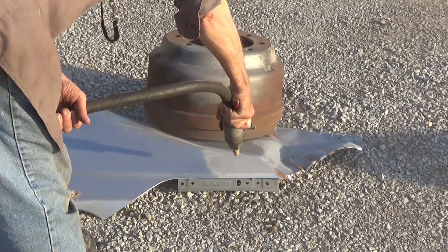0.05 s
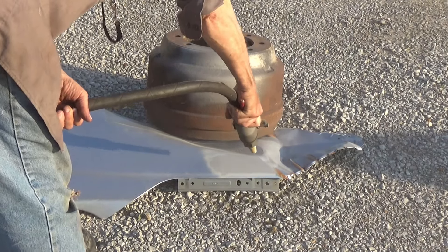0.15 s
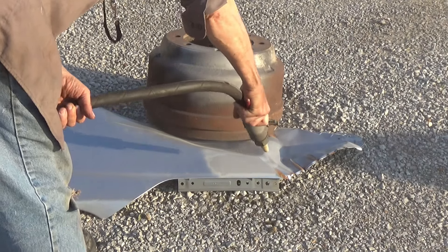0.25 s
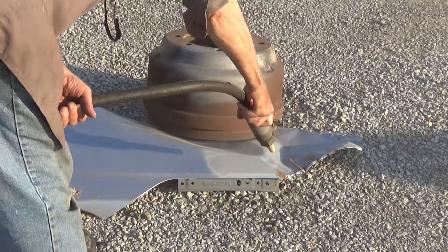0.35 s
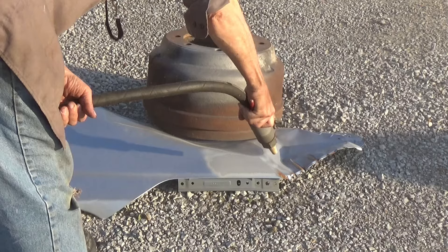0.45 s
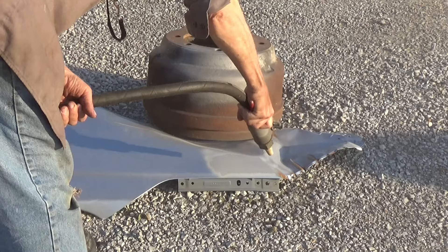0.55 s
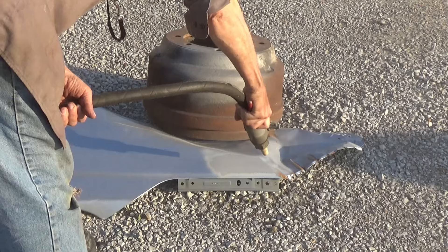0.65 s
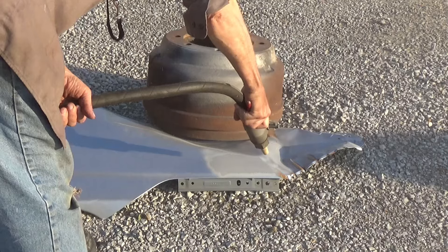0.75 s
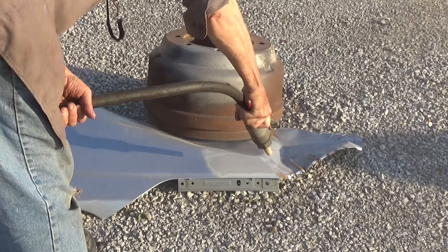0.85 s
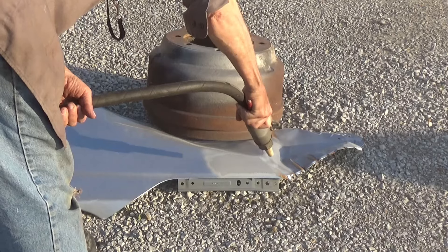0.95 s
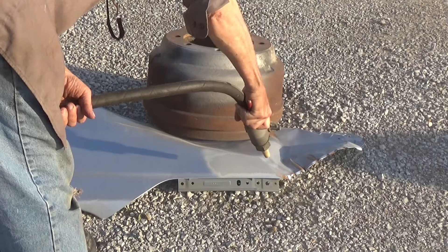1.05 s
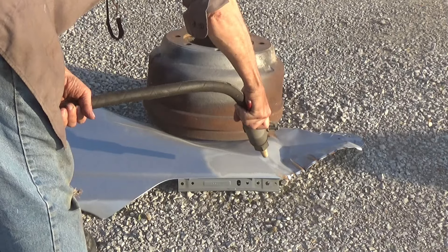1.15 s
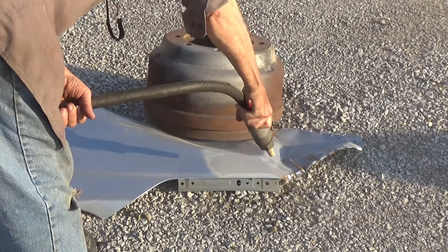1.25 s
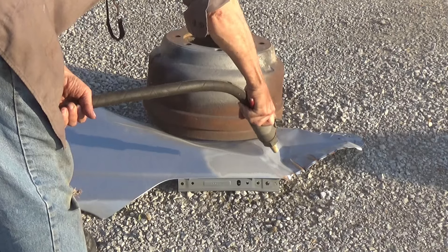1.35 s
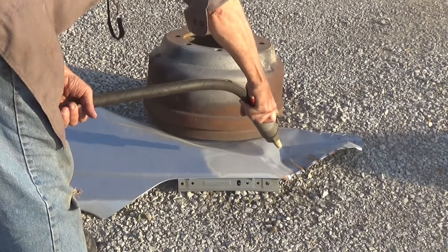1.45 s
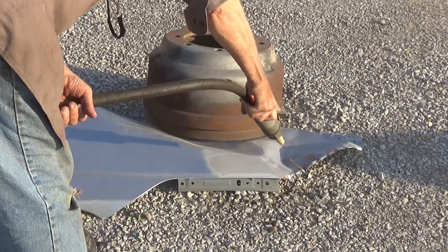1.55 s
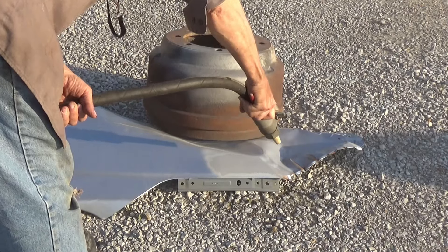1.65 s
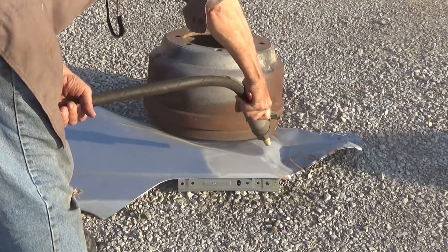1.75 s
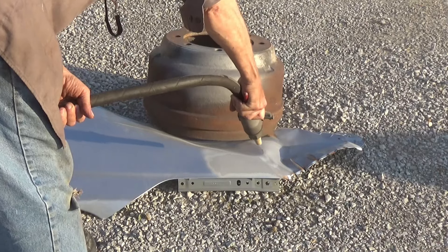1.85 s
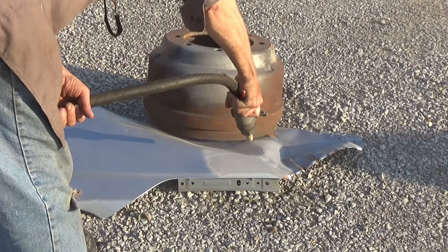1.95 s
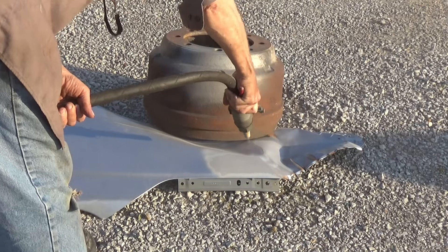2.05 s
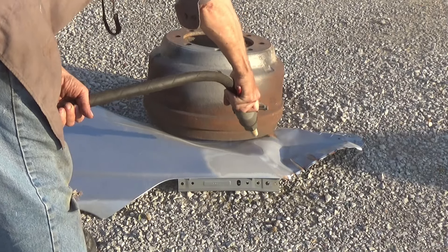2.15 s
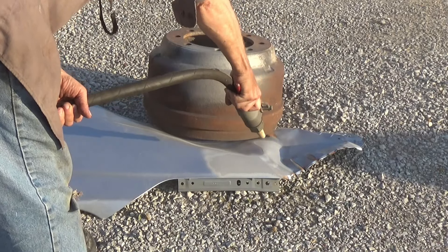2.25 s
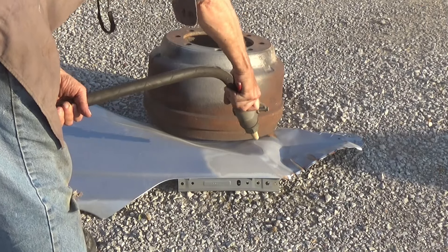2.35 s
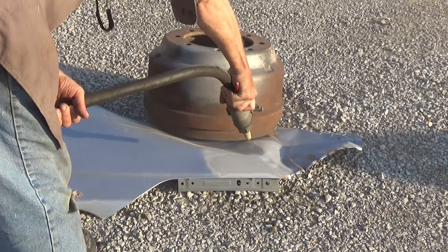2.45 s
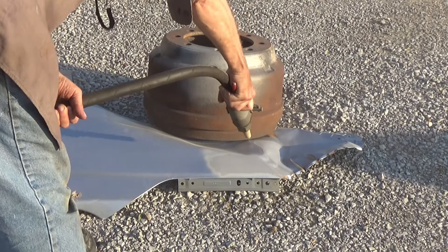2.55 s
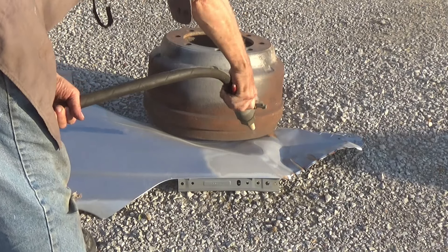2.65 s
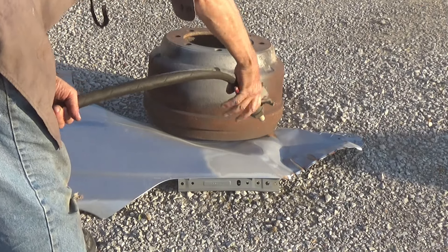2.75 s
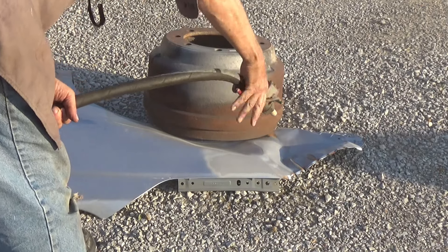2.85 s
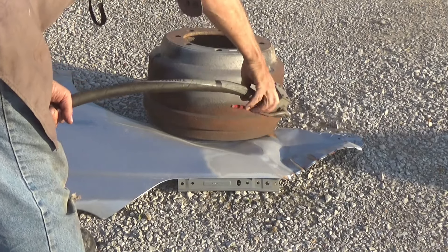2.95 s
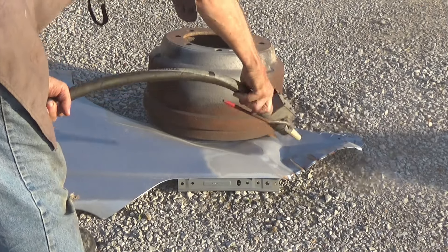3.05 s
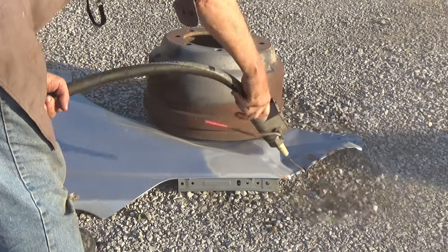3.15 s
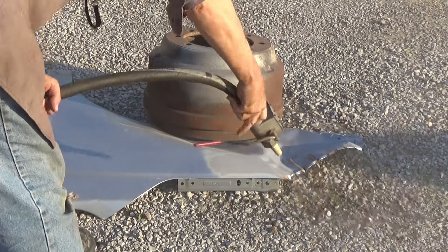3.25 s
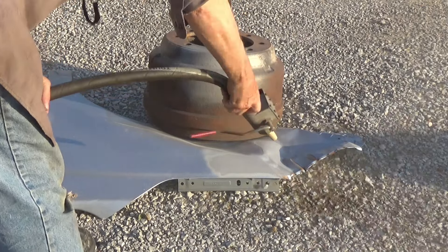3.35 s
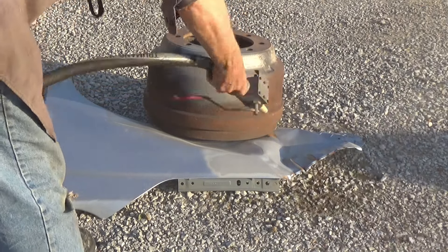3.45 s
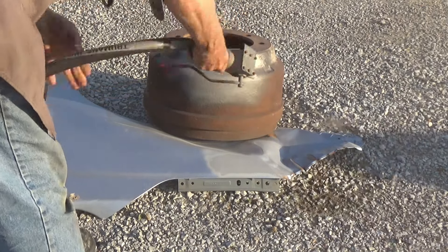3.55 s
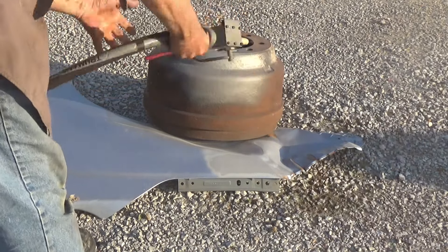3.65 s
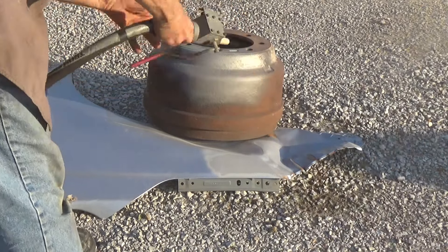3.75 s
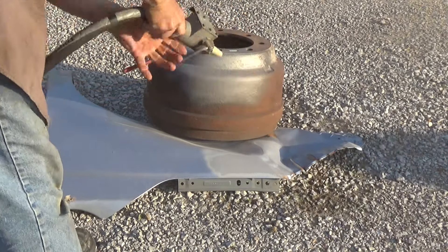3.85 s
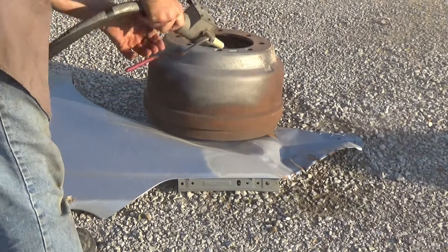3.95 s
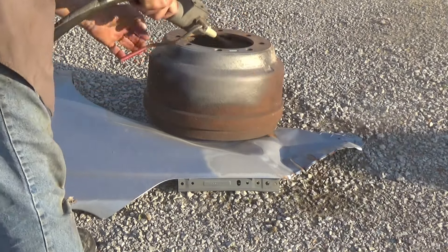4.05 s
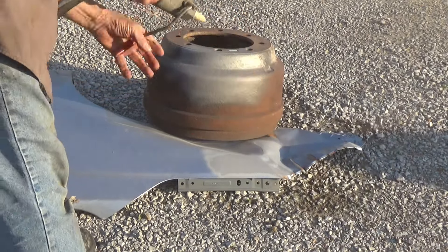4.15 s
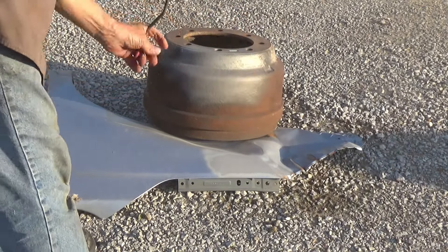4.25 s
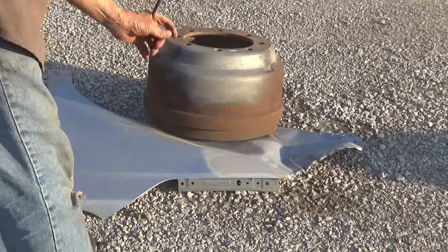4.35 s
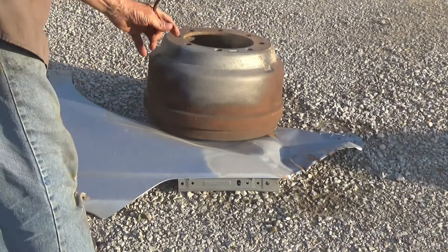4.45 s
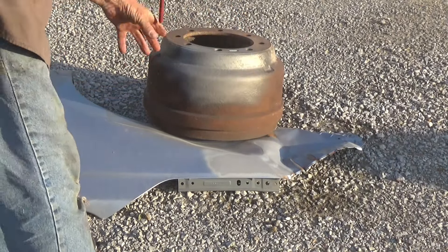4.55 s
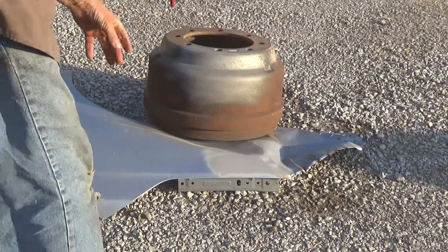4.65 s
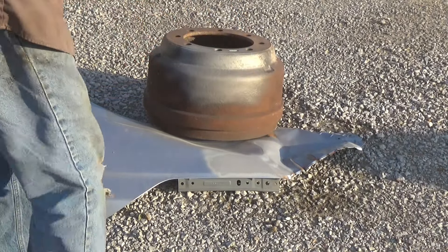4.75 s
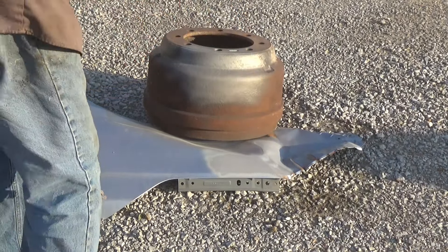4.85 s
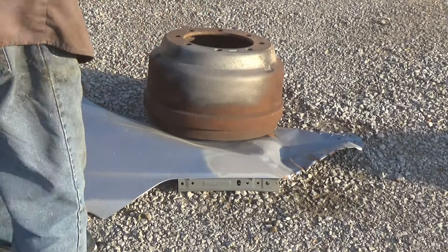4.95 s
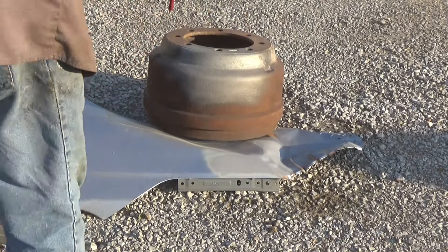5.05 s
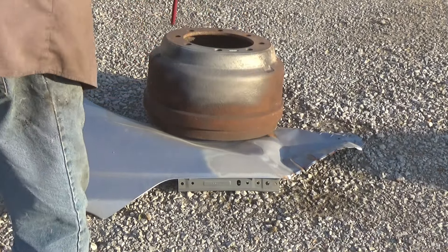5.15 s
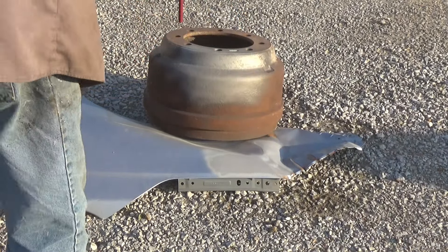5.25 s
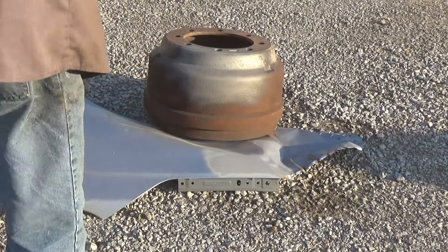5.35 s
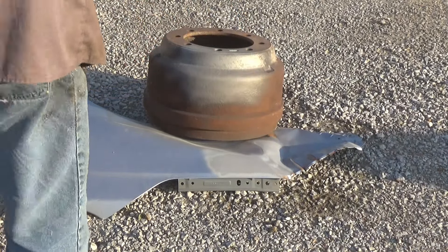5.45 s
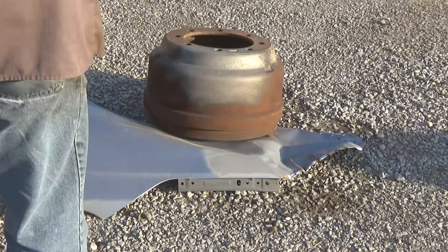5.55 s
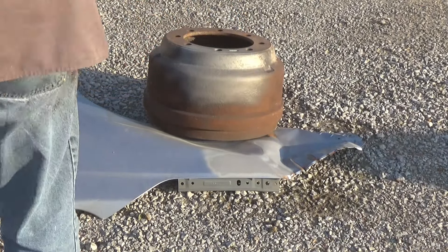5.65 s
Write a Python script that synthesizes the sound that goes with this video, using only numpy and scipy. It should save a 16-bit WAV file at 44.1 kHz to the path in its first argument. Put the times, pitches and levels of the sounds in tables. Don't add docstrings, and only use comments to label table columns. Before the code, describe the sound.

Close by in an open gravel yard, a sandblasting nozzle hisses loudly and grittily against a steel drum, its tone sweeping as the hand moves. Low puffs swell through it. The jet shuts off suddenly, with a short tail from nearby walls and a faint later answer from a far building. A quiet compressor chugs to the left with leaking air; faint birds and one stone click follow. The microphone's automatic gain opens up.

```python
import sys
import numpy as np
from scipy import signal
from scipy.fft import rfft, irfft, next_fast_len
from scipy.io import wavfile
from scipy.ndimage import uniform_filter1d, map_coordinates

SR = 44100
rng = np.random.default_rng(int(sys.argv[2]) if len(sys.argv) > 2 else 0)


def amplitude_ratio(level_db):
    exponent = np.asarray(level_db, float) / 20
    return 10 ** exponent


def unload_audio(sound):
    columns = np.transpose(np.atleast_2d(sound))
    steps = np.round(np.clip(columns, -1, 1) * 32767)
    wavfile.write(sys.argv[1], SR, steps.astype(np.int16))


N = 251811
TIME = np.arange(N) / SR
SHUT_S = 4.397
TURN_HZ = 19.987

# t/s, level/dB, facing the listener/0-1, contact with steel/0-1, beam pitch f/Hz
JET_POSES = [(0, -16.5, 1, 0.92, 10000), (.24, -16, 0.76, 0.98, 10500), (.38, -15.5, 0, 0.58, 10700),
             (.7, -15.5, 0.36, 0.77, 11050), (.9, -16, 0.22, .7, 10940), (1.15, -15.5, 0.51, 0.88, 10900),
             (1.44, -16, 0.15, 0.93, 10700), (1.5, -14.5, 0.2, 0.55, 10000),
             (1.72, -15.5, 0.3, 0.58, 10400), (1.92, -14, 0, 0.21, 9940), (2.4, -14, 0.08, 0.09, 9760),
             (2.75, -13.5, 0.23, 0, 9560), (3.05, -16.5, 0.48, 0.56, 10200),
             (3.3, -16.5, 0.51, 0.42, 10640), (3.75, -15.5, 0.41, 0.25, 10240),
             (3.92, -15.5, 0.55, 0.24, 10000), (4.3, -15.5, 0.8, 0.32, 10000), (4.39, -13, 0.42, 0.2, 9700)]
# low f/Hz, high f/Hz
JET_BANDS_HZ = [(250, 800), (900, 2400), (2800, 7200), (7500, 15500)]
BAND_BASE_DB = [-39, -32.5, -15.5, 0.5]
# change at full facing/dB, change at full contact/dB
BAND_SWING_DB = [(-8.5, 11.5), (1.5, 12), (8.5, 1), (-0.5, -0.5)]
# f/Hz, density/dB per Hz
JET_COLOUR = [(100, -78), (170, -42.5), (509, -22), (664, -19.5), (987, -9), (1310, -6), (1580, -4.5),
              (2060, -5.5), (2490, -10.5), (2900, -8.5), (4930, -6.5), (6930, -14.5), (9550, -9.5),
              (12900, -21), (15600, -34)]
# f/Hz, level/dB
JET_APART = [(300, -33), (1000, -27), (3000, -137), (6000, -59), (8000, -23), (9300, -27), (11000, -27.5),
             (13000, -28)]
# t/s, delay/ms, strength/ratio
SHEET = [
    (0, .57, .3),
    (.33, .58, .05),
    (1.98, .615, .4),
    (2.68, .585, .15),
    (3.0, .6, 0),
    (3.7, .895, 0),
    (3.84, .895, -.33),
]
# t/s, delay/ms, strength/ratio
DRUM = [
    (0, .57, .25),
    (.15, .69, -.4),
    (.28, .6, -.4),
    (.45, .59, -.2),
    (.68, .579, -.45),
    (1.81, .68, -.3),
    (1.97, .595, .05),
    (2.68, .585, .2),
    (3.0, .58, 0),
]
# middle t/s, length/s, level/dB
GUSTS = [
    (2.16, .17, -44),
    (2.72, .5, -50),
    (3.1, .05, -44),
    (3.49, .1, -46),
    (1.42, .08, -51),
    (1.75, .2, -52),
    (3.71, .04, -51),
]
# f/Hz, density/dB per Hz
GUST_COLOUR = [(120, -32), (260, -12), (480, 0), (1100, -2), (1500, -12), (2500, -40)]
# f/Hz, t60/s
YARD_T60 = [(300, 0.11), (2000, 0.13), (6000, 0.52), (10000, 0.14), (15000, 0.15)]
# f/Hz, level/dB
YARD_COLOUR = [(100, -23), (2500, 10.5), (4800, -6), (7500, -2), (11000, 7.5), (16000, 0)]
# f/Hz, level/dB
WALL_COLOUR = [(1000, -10), (3000, 1), (6500, 2.5), (10000, -11), (14000, -14)]
# f/Hz, level/dB
DIFFUSE_APART = [(150, -42), (600, -4), (1400, -77), (3000, -6.5), (6000, -7), (9500, -11.5), (12000, -26),
                 (15000, -30)]
# crank order, level/dB
INTAKE_ORDERS = [(26, -47), (30, -51.5), (25, -54), (27, -55), (28, -55), (24, -59), (18, -61), (20, -62),
                 (21, -61), (23, -63), (34, -63), (35, -65), (47, -64), (54, -57.5), (8, -74), (9, -74)]
# t/ms, level/dB
STROKE = [(0, -1), (5, -1.5), (11, -.5), (16, -5), (24, -2), (29, 2), (38, 4), (45, 4), (49, 0)]
# start t/ms, length/ms, f/Hz, level/dB, left-right/dB
VALVES = [(8, 11, 1490, -53, 9), (23.5, 6, 1500, -54, 10), (29, 9, 1720, -54, 12), (30, 12, 1480, -52, 12),
          (40, 8, 1600, -58, 10), (26, 8, 1040, -58, 10), (33, 15, 1080, -57, 7), (1, 6, 1200, -54, 10),
          (0, 8, 1560, -55, 10), (39, 11, 1840, -57, 11), (8, 7, 2850, -61, 5), (42, 7, 2850, -61, 5),
          (30, 22, 270, -59, 1), (32, 14, 420, -54, 2), (26, 14, 700, -58, 4)]
# f/Hz, density/dB per Hz
CASING = [(150, -30), (260, -19), (480, -11), (620, -17), (800, -16), (1070, -15), (1280, -12), (1450, -12),
          (1880, -12), (1990, -26), (3000, -40)]
# f/Hz, density/dB per Hz
LEAK = [(300, -40), (520, -22), (850, -25), (1530, -21), (2100, -15), (4000, -24), (5100, -22), (7300, -22),
        (10400, -8.5), (12000, -29), (14500, -23), (15700, -38)]
# f/Hz, width/Hz, level/dB
PIPES = [(2800, 190, -8), (3580, 90, -8), (5110, 130, -8), (6080, 130, -12), (7950, 140, -8),
         (9390, 140, -7), (10200, 150, -3), (10550, 120, -3), (11200, 90, -11), (12700, 230, -14)]
# f/Hz, left-right/dB
FAR_PAN = [(200, -5), (700, 14), (1290, 2.5), (2380, 5.5), (4400, 8.5), (8120, -0.5), (15000, 0)]
# start t/s, length/s, start f/Hz, end f/Hz, level/dB
BIRDS = [
    (4.69, .175, 4780, 4740, -59.5),
    (4.69, .075, 2760, 2860, -63),
    (5.24, .068, 2800, 2560, -57),
    (5.374, .05, 2830, 2430, -54),
    (5.325, .04, 3570, 3580, -62),
]
# t/s, peak level/dB
TICKS = [
    (5.0815, -27),
]
# t/s, level/dB
GAIN = [
    (0, -14.5),
    (2, -11.5),
    (3.5, -11),
    (4.38, -10.5),
    (4.45, -2.5),
    (5.0, -1),
    (5.71, 0.6),
]
# f/Hz, density/dB per Hz
FLOOR = [(20, -24), (40, -20), (90, -13), (150, -2), (250, 15), (400, -41)]


def jet(patchy_db=1.5, fine_db=0.5, grit=0.23):
    load = amplitude_ratio(0.14 * wobble(8.3) + 0.53 * wobble(40))
    air = rng.standard_normal((2, N)) * (1 + grit * rng.standard_normal(N)) * load
    hz, t, z = signal.stft(air, SR, nperseg=512)
    rows_hz = hz[:, None]

    def blur(rows, cols):
        smooth = uniform_filter1d(rng.standard_normal(z.shape[1:]), rows, 0)
        return unit(uniform_filter1d(smooth, cols, 1))

    rest_colour = amplitude_ratio(along(JET_COLOUR, hz))
    pose_s, *poses = np.transpose(JET_POSES)
    level_db, facing, contact, beam_hz = (np.interp(t, pose_s, column) for column in poses)

    band_gain_db = []
    for base_db, (face_db, touch_db), (low_hz, high_hz) in zip(BAND_BASE_DB, BAND_SWING_DB, JET_BANDS_HZ):
        inside = (hz > low_hz) & (hz < high_hz)
        rest_db = 10 * np.log10(np.sum(rest_colour[inside] ** 2) / len(hz))
        band_gain_db.append(level_db + base_db + face_db * facing + touch_db * contact - rest_db)
    bands = np.arange(len(band_gain_db))
    centre_hz = np.sqrt(np.prod(JET_BANDS_HZ, axis=1))
    place = np.interp(np.log(hz + 1), np.log(centre_hz), bands)
    share = np.clip(1 - abs(place[:, None] - bands), 0, 1)

    rest_hz, from_hz = 10000, 2800
    slide_hz = np.clip(1 - abs(rows_hz - rest_hz) / (rest_hz - from_hz), 0, 1) * (rest_hz - beam_hz)
    colour = amplitude_ratio(along(JET_COLOUR, rows_hz + slide_hz))
    patches_db = patchy_db * blur(rows=5, cols=30) + fine_db * blur(rows=3, cols=8)

    treble = 1 / (1 + (7500 / (rows_hz + 1)) ** 10)
    drum_share = treble / (1 + (rows_hz / 12500) ** 8)
    echo = bounce(SHEET, rows_hz, t, 1 - treble) * bounce(DRUM, rows_hz, t, drum_share)
    z = z * colour * echo * amplitude_ratio(share @ band_gain_db + patches_db + 0.22)
    hiss = signal.istft(z, SR, nperseg=512)[1][:, :N]
    hiss = filtered(hiss, lambda f: 1 / (1 + (150 / (f + 1)) ** 6))
    closing = 1 + np.exp(np.clip((TIME - SHUT_S) / 0.0064, -50, 50))
    return spread(*hiss, JET_APART) / closing


def bounce(poses, hz, t, share):
    swing_s, tremble, tremble_ms = .11, .22, .006
    pose_s, *pose = np.transpose(poses)
    held = np.array(pose)[:, np.searchsorted(pose_s, t, "right") - 1]
    delay_ms, strength = uniform_filter1d(held, round(swing_s / t[1]), axis=1, mode="nearest")
    shake = lambda: np.interp(t, TIME, wobble(5))
    g = share * strength * (1 + tremble * shake())
    delay_s = (delay_ms + tremble_ms * shake()) / 1000
    return (1 + g * np.exp(-2j * np.pi * hz * delay_s)) / np.sqrt(1 + g * g)


def gusts():
    swell = sum(amplitude_ratio(db) * np.exp(-(2 * (TIME - s) / length_s) ** 2) for s, length_s, db in GUSTS)
    puff = unit(filtered(rng.standard_normal(N), lambda hz: amplitude_ratio(along(GUST_COLOUR, hz))))
    return swell * amplitude_ratio(1.6 * wobble(30)) * puff


def yard(x, stretch):
    hz, t, z = signal.stft(rng.standard_normal((2, SR)), SR, nperseg=256)
    t60_s = stretch * along(YARD_T60, hz)[:, None]
    decay_db = along(YARD_COLOUR, hz)[:, None] - 60 * t / t60_s
    tail = signal.istft(z * amplitude_ratio(decay_db), SR, nperseg=256)[1]
    tail = tail / np.linalg.norm(tail[0])
    return spread(*signal.fftconvolve(x[None], tail, axes=1)[:, :N], DIFFUSE_APART)


def far_wall(x):
    delay_s, level_db = .255, -35
    late = np.pad(x, (round(delay_s * SR), 0))[:N]
    return amplitude_ratio(level_db) * filtered(yard(late, stretch=0.37), lambda hz: amplitude_ratio(along(WALL_COLOUR, hz)))


def compressor(scatter_db=-4.0):
    repeat_db, loose_db = -55.5, -60.5
    turn_s = ((TIME - 4.6) * TURN_HZ) % 1 / TURN_HZ
    ms, db = np.transpose(STROKE)
    stroke = amplitude_ratio(np.interp(turn_s * 1000, ms, db, period=1000 / TURN_HZ) + .4 * wobble(8))
    angle = 2 * np.pi * TURN_HZ * (turn_s - .0082)
    beat = sum(amplitude_ratio(db) * np.cos(order * angle) for order, db in INTAKE_ORDERS)
    out = amplitude_ratio(-1.9) * stroke * beat * amplitude_ratio([[1.9], [-1.9]])
    for ms, length_ms, hz, db, pan_db in VALVES:
        t = (turn_s - ms / 1000) % (1 / TURN_HZ)
        swell = np.sqrt(np.sin(np.pi * np.clip(t / (length_ms / 1000), 0, 1)) + 1e-9)
        flutter = amplitude_ratio(db + 1.0 + scatter_db * wobble(5.6)) * swell * np.sin(2 * np.pi * hz * t)
        out += amplitude_ratio([[pan_db / 2], [-pan_db / 2]]) * flutter
    casing = lambda hz: amplitude_ratio(along(CASING, hz))
    one_turn = far_noise(casing)[:, (turn_s * SR).astype(int)]
    chuff = amplitude_ratio(3.2 * np.sin(2 * np.pi * TURN_HZ * turn_s + 3.4))
    return out + chuff * (amplitude_ratio(repeat_db) * one_turn + amplitude_ratio(loose_db) * far_noise(casing))


def leak():
    def pipes(f):
        power = sum((amplitude_ratio(db) * w / 2) ** 2 / ((f - c) ** 2 + w * w / 4) for c, w, db in PIPES)
        return np.sqrt(power)

    pulse = amplitude_ratio(2.1 * np.sin(4 * np.pi * TURN_HZ * TIME + 1.1) + 0.66 * wobble(12))
    hiss = amplitude_ratio(-53) * far_noise(lambda hz: amplitude_ratio(along(LEAK, hz)))
    return hiss + amplitude_ratio(-54.0) * pulse * far_noise(pipes)


def far_noise(response):
    sides = lambda hz: response(hz) * amplitude_ratio(np.outer([.5, -.5], along(FAR_PAN, hz)))
    return unit(filtered(spread(*rng.standard_normal((2, N)), DIFFUSE_APART), sides))


def birds():
    arch, warble, hoarse_db_per_s = .5, .004, 18
    out = np.zeros(N)
    for s, length_s, hz0, hz1, db in BIRDS:
        u = np.clip((TIME - s) / length_s, 0, 1)
        glide_hz = hz0 + (hz1 - hz0) * u ** 1.5
        arch_hz = arch * abs(hz1 - hz0) * np.sin(np.pi * u ** .7)
        pitch_hz = (glide_hz + arch_hz) * (1 + warble * wobble(50))
        level = amplitude_ratio(db + 3.5 + hoarse_db_per_s * length_s * wobble(45))
        swell = np.sqrt(abs(np.sin(np.pi * u))) * (u < 1)
        out += level * swell * np.sin(2 * np.pi * np.cumsum(pitch_hz) / SR)
    return out * amplitude_ratio([[1.5], [-1.5]])


def ticks():
    out = np.zeros(N)
    for s, db in TICKS:
        out[round(s * SR)] = amplitude_ratio(db + 5)
    return filtered(out, lambda hz: (.4 + np.exp(-((hz - 7200) / 2000) ** 2)) / (1 + (hz / 10500) ** 8))


def unit(x):
    return x / np.sqrt(np.mean(x ** 2) + 1e-20)


def along(points, hz):
    f, v = np.transpose(points)
    return np.interp(np.log(hz + 1), np.log(f + 1), v)


def filtered(x, response):
    m = next_fast_len(x.shape[-1] + 8192)
    return irfft(rfft(x, m) * response(np.fft.rfftfreq(m, 1 / SR)), m)[..., :x.shape[-1]]


def wobble(rate_hz):
    return map_coordinates(rng.standard_normal(int(N * rate_hz / SR) + 4), [TIME * rate_hz])


def spread(a, b, apart):
    side = filtered(b, lambda hz: amplitude_ratio(along(apart, hz)))
    return np.array([a + side, a - side])


def scene():
    hiss = jet() + gusts()
    near = hiss * amplitude_ratio([[-.15], [.15]])
    near = near + amplitude_ratio(-17) * yard(hiss[0], stretch=1.0) + amplitude_ratio(-23.5) * yard(hiss[0], stretch=3.4)
    near = near + far_wall(hiss[0])
    far = compressor() + leak() + birds() + ticks()
    return near + amplitude_ratio(np.interp(TIME, *np.transpose(GAIN))) * far


def roll_off(x):
    return signal.sosfilt(signal.butter(12, 15770, fs=SR, output="sos"), x)


def record(dry, top=0.74):
    rumble = unit(filtered(rng.standard_normal(N), lambda hz: amplitude_ratio(along(FLOOR, hz))))
    x = dry + amplitude_ratio(-75.0) * rumble
    x = x / (1 + abs(x / top) ** 4) ** (1 / 4)
    return roll_off(filtered(x, lambda hz: hz < 15780))


dry = scene()
out = record(dry)
unload_audio(out)
```